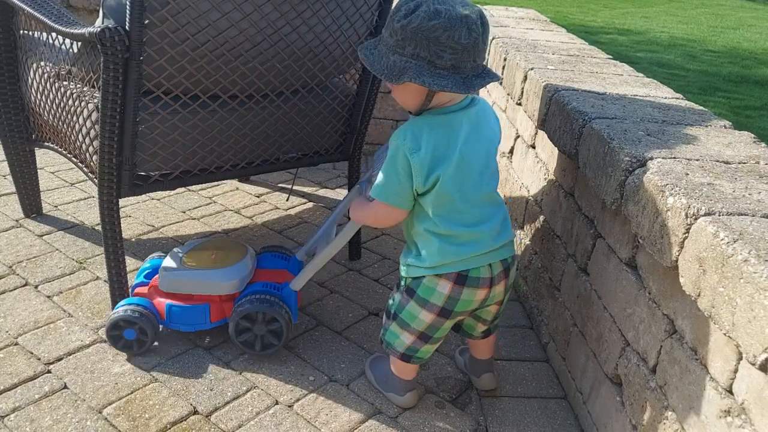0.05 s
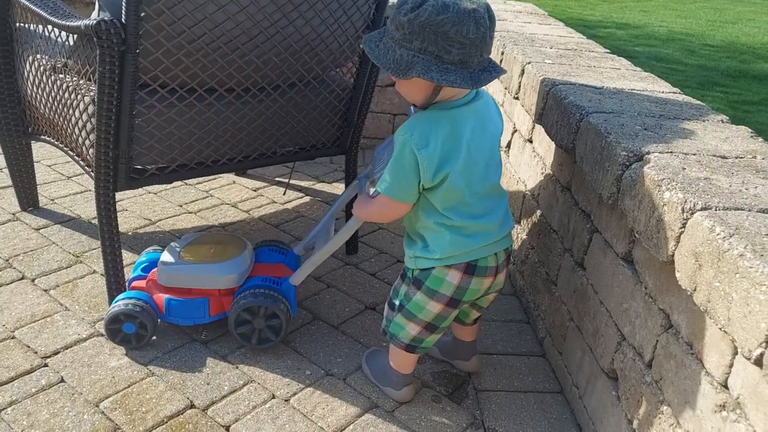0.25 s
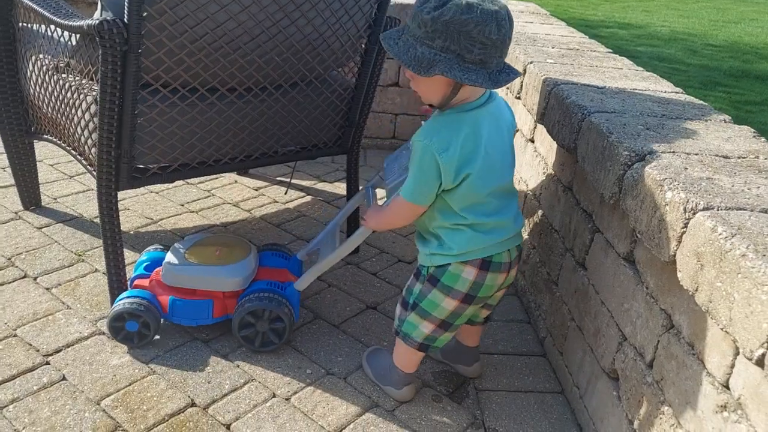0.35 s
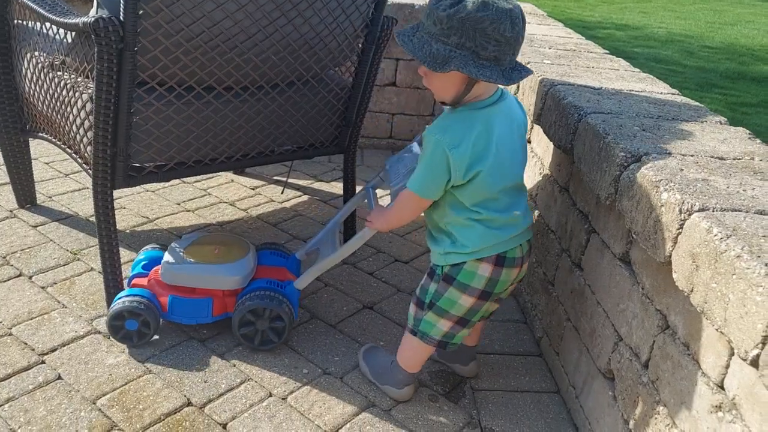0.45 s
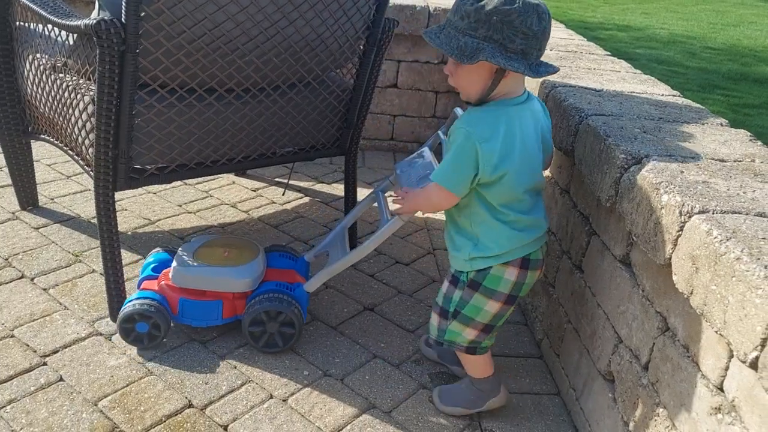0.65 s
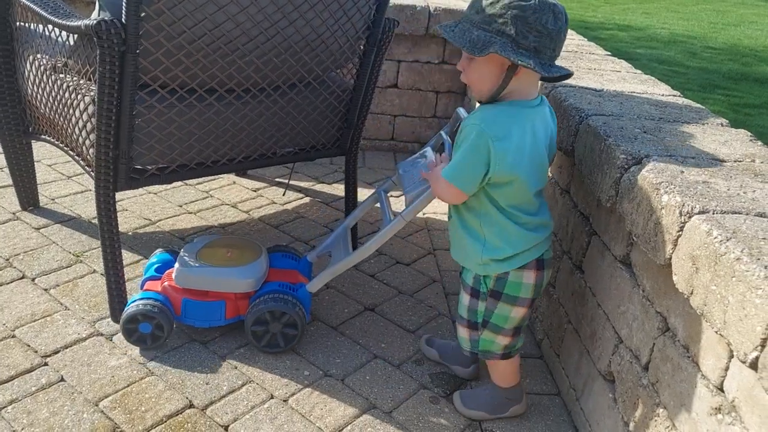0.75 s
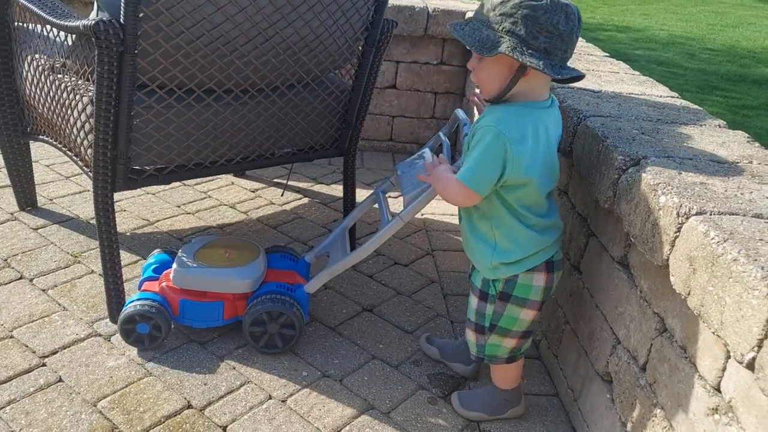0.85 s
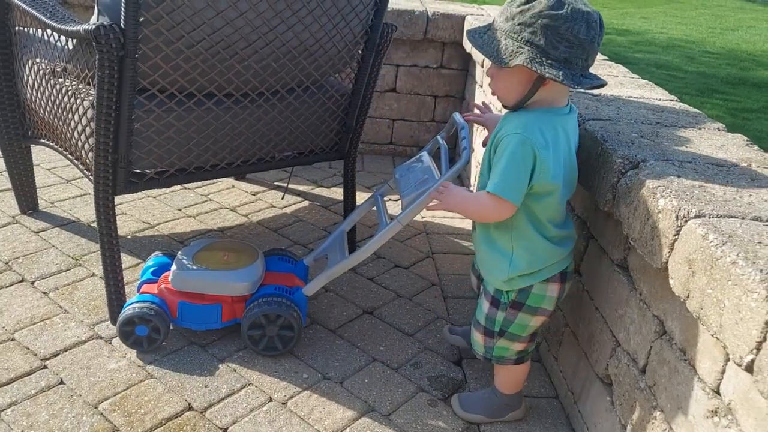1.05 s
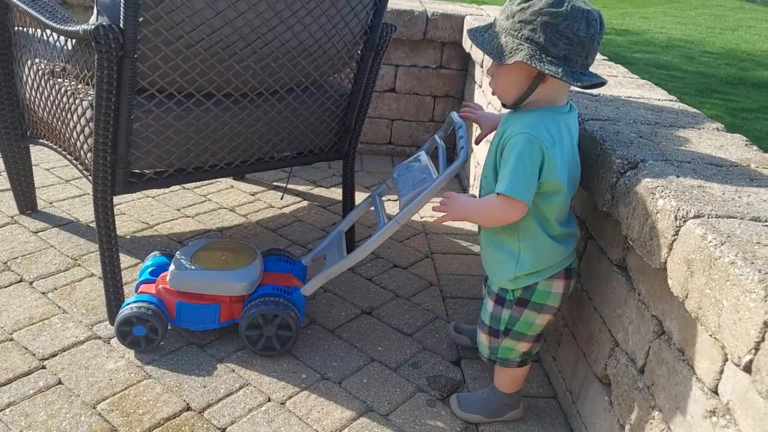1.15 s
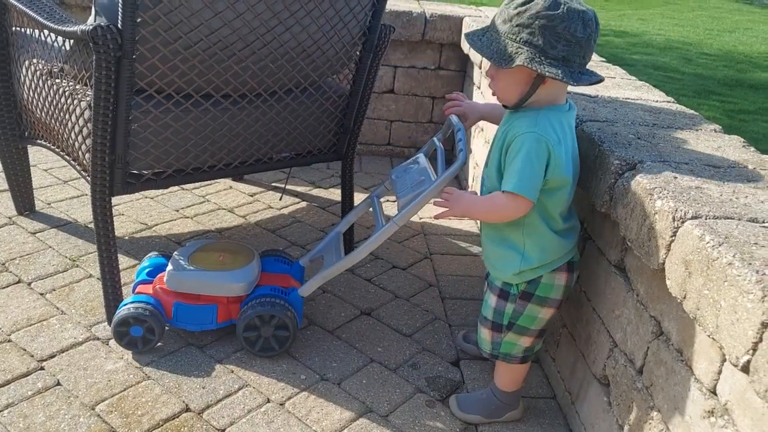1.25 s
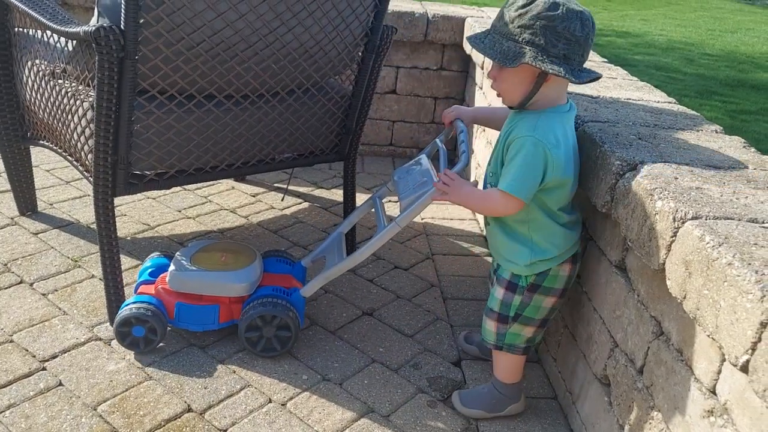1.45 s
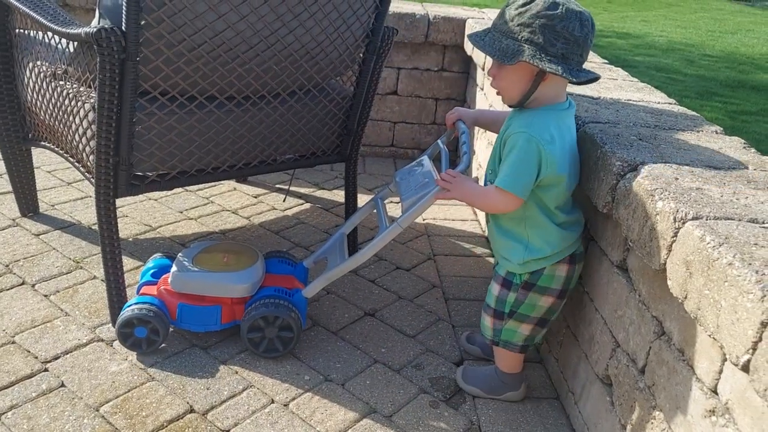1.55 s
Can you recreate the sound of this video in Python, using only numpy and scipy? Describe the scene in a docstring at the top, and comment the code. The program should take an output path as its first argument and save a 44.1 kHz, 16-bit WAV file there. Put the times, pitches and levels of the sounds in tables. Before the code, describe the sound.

Hollow plastic knocks and a short gritty wheel scrape from a toy push mower on stone paving

```python
"""A plastic toy mower is nudged over patio pavers, heard by a two-port microphone in the garden.
Out of silence come faint outdoor hush and light wind buffets; the hollow shell knocks, the wheels roll
briefly, plastic squeaks and low thuds follow. A shoe scuffs, a grain snaps, a thin chirp warbles and a
small bird trills on; the shell is knocked again and the wheels judder and scrape over gritty stone with
sharp snaps. At the very end a soft rolling rub swells up as the mower moves off. Paving and a low wall
reflect the patio sounds."""
import sys
import numpy as np
from scipy import signal
from scipy.fft import rfft, irfft
from scipy.io import wavfile
from scipy.ndimage import uniform_filter1d

SR = 44100
rng = np.random.default_rng(int(sys.argv[2]) if len(sys.argv) > 2 else 0)


def generate_wav(sig):
    """Save sig (samples, or channels by samples) to the path in sys.argv[1] as 16-bit PCM at SR."""
    pcm = np.round(np.clip(np.atleast_2d(sig).T, -1, 1) * 32767).astype(np.int16)
    wavfile.write(sys.argv[1], SR, pcm)


N = 70560
T = np.arange(N) / SR  # seconds
OPEN_S = 0.1463  # the sound begins

# Blows on the shell. Each row: start in seconds, peak level in dB before reflections,
# centre of the colour in Hz, level in dB of the contact crack before its tone filter.
BLOWS = [(0.156, -47.5, 445, -61), (0.178, -46, 480, -85), (0.1983, -37, 1090, -54),
         (.208, -39.5, 1920, -39), (.313, -40.5, 365, -56), (.337, -40, 480, -65), (0.4079, -23, 560, -43),
         (.414, -27, 650, -39.5), (.426, -24, 543, -39.5), (.442, -34, 700, -45), (0.736, -50, 920, -56),
         (.774, -46.5, 920, -54), (1.112, -37.5, 490, -75), (1.1193, -30, 450, -78),
         (1.124, -28.5, 613, -47), (1.129, -31, 766, -41), (1.203, -53, 500, -57), (1.295, -39, 620, -49)]
# Wheels scraping on stone. Each row: time in seconds, level in dB of the shell's drone,
# of its mid rattle, and of the grit before its tone filter.
SCRAPE_LEVELS = [(1.118, -70, -84, -68), (1.127, -30, -64, -37), (1.148, -43, -43, -42.5),
                 (1.172, -35.5, -45, -43.5), (1.185, -44, -41, -48), (1.204, -40, -39, -41),
                 (1.222, -40.5, -41.5, -55), (1.256, -42.5, -44.5, -39.5), (1.266, -50, -51, -45),
                 (1.282, -43, -49, -43.5), (1.298, -42.5, -47.5, -51.5), (1.308, -51, -85, -49),
                 (1.35, -57, -63, -68), (1.41, -73, -81, -111)]


def amp(db):
    """Decibels to gain."""
    return 10 ** (np.asarray(db) / 20)


def unit(x):
    """Scales to rms 1."""
    return x / np.sqrt(np.mean(x ** 2) + 1e-20)


def read(points, hz):
    """Reads a curve of (Hz, value) points on a log-frequency axis."""
    f, value = np.transpose(points)
    return np.interp(np.log(hz + 1), np.log(f), value)


def level(rows, order=1):
    """One dB column of a timed curve as gain, practically silent outside it."""
    rows = np.array(rows)
    return amp(np.interp(T, rows[:, 0], rows[:, order], left=-140, right=-140))


def add(mix, s, sound):
    """Mixes a sound in at a time in seconds."""
    part = mix[round(s * SR):][:len(sound)]
    part += sound[:len(part)]


def pan(db):
    """Left and right gains for a level difference; positive leans left."""
    return amp(np.array([[.5], [-.5]]) * db)


def colour(x, shape, size=4096):
    """Causal, minimum-phase filter with the given spectrum."""
    db = read(shape, abs(np.fft.fftfreq(size, 1 / SR)))
    spectrum = np.exp(np.conj(signal.hilbert(np.log(amp(db)))))
    taps = np.fft.ifft(spectrum).real
    return signal.fftconvolve(x, taps[:size // 2])[:len(x)]


def grains(per_s, spread_db):
    """Random clicks of uneven size and either sign."""
    size = amp(spread_db * np.minimum(rng.exponential(1, N), 4))
    sign = rng.choice([-1, 1], N)
    return unit(size * sign * (rng.random(N) < per_s / SR))


def unsteady(hz, jitter):
    """Phase of a tone whose pitch trembles."""
    tremble = unit(uniform_filter1d(rng.standard_normal(len(hz)), size=90))
    return 2 * np.pi * np.cumsum(hz * (1 + jitter * tremble)) / SR


def echo(x, t60):
    """Scattered reflections: a decaying noise tail, different in each channel."""
    t = T[:SR // 2]
    tail = rng.standard_normal((2, len(t))) * amp(-60 * t / t60) * (t > .001)
    tail /= np.linalg.norm(tail, axis=1)[:, None]
    return signal.fftconvolve(x[None], tail, axes=1)[:, :N]


def patio(x, room_db=0):
    """Direct sound, the short scatter of paving close by and the longer one of the wall."""
    near_db, near_t60 = -3, 0.017
    wall_db, wall_t60 = -10, 0.32
    near = amp(near_db) * echo(x, near_t60)
    wall = amp(wall_db) * echo(x, wall_t60)
    return x + amp(room_db) * (near + wall)


def ports(x, balance, phase):
    """Level and phase differences between the two microphone ports, by frequency."""
    hz = np.fft.rfftfreq(N, 1 / SR)
    turn = np.exp(1j * np.array([[.5], [-.5]]) * read(phase, hz))
    return irfft(rfft(x) * pan(read(balance, hz)) * turn, N)


def air():
    """Faint outdoor hush: coloured noise, partly shared by both ports, that swells in at the start."""
    # Each row: frequency in Hz, spectrum in dB.
    air_tone = [(120, -6), (200, -3), (465, 0.5), (671, -16.5), (1230, -18), (1530, -6.5), (1770, -25.5),
                (2750, -22), (5040, -15), (5730, -28.5), (6640, -26), (7540, -16), (8900, -24.5),
                (14600, -21), (16000, -55.5)]
    air_db, rise_s = -64, 0.15
    left, right, both = [unit(colour(rng.standard_normal(N), air_tone)) for _ in range(3)]
    hush = unit(np.array([left, right]) + 0.38 * both)
    return amp(air_db) * hush * np.sqrt(np.clip((T - OPEN_S) / rise_s, 0, 1))


def wind():
    """Low buffets on the microphone: evened-out low noise, unrelated at the two ports."""
    # Each row: time in seconds, level in dB, left-right difference in dB.
    gusts = [(0.16, -51, 20), (0.254, -63, 8), (0.274, -44, 12.5), (0.306, -37, 6.5), (0.364, -50, -6),
             (0.404, -42, 15), (0.424, -35, 8.5), (0.48, -42.5, -1), (0.5, -36, -2.5), (0.558, -40.5, -7),
             (0.598, -57, -8.5), (0.626, -43.5, 5.5), (0.666, -42, -9.0), (0.724, -51, 5.5),
             (0.764, -58.5, -7.5), (0.898, -61, 10.5), (0.914, -50.5, 17.5), (0.962, -46, -13.5),
             (1.112, -53, 1), (1.136, -44, 18.5), (1.208, -56, 27.5), (1.29, -42, 0), (1.362, -47, 13.5),
             (1.402, -64, -8), (1.432, -56.5, 25.5), (1.488, -57.5, 24.5), (1.532, -77, 12.0),
             (1.58, -61, 1)]
    # Each row: frequency in Hz, spectrum in dB.
    wind_tone = [(15, -35), (30, -24.5), (50, -3), (68, 1), (85, -4.5), (105, -9.5), (150, -19.5),
                 (220, -26), (400, -31.5), (1200, -73.5)]
    s, db, side_db = np.transpose(gusts)
    lumps = np.array([colour(rng.standard_normal(N), wind_tone) for _ in range(2)])
    lumps /= np.sqrt(uniform_filter1d(lumps ** 2, size=1800, axis=1) + 1e-12)
    return lumps * amp(np.interp(T, s, db)) * pan(np.interp(T, s, side_db))


def whistle(length, from_hz, to_hz):
    """One quick glide, swelling and fading."""
    u = np.arange(0, length, 1 / SR) / length
    hz = from_hz + (to_hz - from_hz) * u
    return np.sin(np.pi * u) ** 2 * np.sin(2 * np.pi * np.cumsum(hz) / SR)


def bird():
    """An even trill across the garden: falling whistle, rising flick, each a little out of tune."""
    # One level in dB per note, before the echo and the lean to one side.
    note_db = [-67.5, -62, -59.5, -56, -57, -60, -59, -52, -49, -51, -53.5, -51, -52]
    start_s, step_s, tune_spread = .7825, .0626, 0.0186
    fall_s, fall_hz = 0.02, (6300, 4000)
    flick_at_s, flick_s, flick_hz, flick_db = .022, .014, (4480, 8770), -4.5  # dB against the fall
    out = np.zeros(N)
    for k, db in enumerate(note_db):
        s = start_s + k * step_s
        tune = 1 + tune_spread * rng.standard_normal(2)
        add(out, s, amp(db) * whistle(fall_s, *np.multiply(fall_hz, tune[0])))
        flick = whistle(flick_s, *np.multiply(flick_hz, tune[1]))
        add(out, s + flick_at_s, amp(db + flick_db) * flick)
    wet_db, t60 = 0, 0.28
    return (out + amp(wet_db) * echo(out, t60)) * pan(db=-9)


def thuds():
    """Soft low thuds of steps and wheels, whose pitch sags as they die."""
    # Each row: start in seconds, peak level in dB before reflections, starting pitch in Hz.
    pushes = [(.271, -44.5, 237), (.284, -41, 84.4), (0.313, -44.5, 142.4), (.500, -35.5, 99),
              (0.91, -47.5, 148.5), (0.949, -42, 123), (0.973, -44, 134), (1.018, -41.5, 125)]
    peak_s, sag_per_s = 0.0068, 14
    out, t = np.zeros(N), T[:SR // 8]
    swell = t / peak_s * np.exp(1 - t / peak_s)
    for s, db, hz in pushes:
        phase = 2 * np.pi * np.cumsum(hz * np.exp(-sag_per_s * t)) / SR
        add(out, s, amp(db) * swell * np.sin(phase))
    return patio(out, room_db=-4.5)


def scuff_and_moving_off():
    """Dense grains in a stony colour: a sole drags over the pavers; at the end the mower rolls off."""
    # Each row: time in seconds, level in dB before reflections and pan;
    # the rise in the last two rows is the mower moving off.
    rub_levels = [(.48, -70), (.58, -68.5), (.63, -62.5), (.70, -60), (.75, -54.5), (.78, -63), (.81, -64),
                  (.9, -92), (1.52, -95), (1.6, -62.5)]
    # Each row: frequency in Hz, spectrum in dB.
    rub_tone = [(250, -19), (470, -2), (650, -4), (850, 5.5), (1250, -23), (1520, -5.5), (1800, -15),
                (2300, -19.5), (2490, -4), (2750, -18), (3900, -10.5), (5700, -15.5), (6800, -9.5),
                (8100, -13.5), (9000, -38), (13000, -20), (16000, -26)]
    rub = unit(colour(grains(per_s=8100, spread_db=3), rub_tone))
    return patio(rub * level(rub_levels)) * pan(db=-3)


def warble():
    """A thin chirp: one sine that wanders quickly in pitch and level."""
    # Each row: time in seconds, level in dB before the chirp gain, pitch in Hz before jitter.
    chirp = [(.695, -72, 3600), (.712, -58, 4500), (.725, -56, 3700), (.731, -58, 4050), (.739, -62, 3400),
             (.750, -55, 4100), (.759, -61, 3200), (.765, -57, 3800), (.78, -70, 2800)]
    gain_db, jitter = 0.5, 0.0098
    s, _, pitch = np.transpose(chirp)
    return amp(gain_db) * level(chirp) * np.sin(unsteady(np.interp(T, s, pitch), jitter))


def squeaks():
    """Thin gliding, fluttering tones of axle and rubbing plastic, with the warbling chirp."""
    # Each row: start in seconds, length in seconds, mid-glide pitch in Hz before jitter,
    # level in dB before flutter, glide as a share of the pitch.
    rubs = [(.198, 0.028, 1511, -44.5, 0.022), (0.276, 0.135, 2310, -58.5, -0.018),
            (.452, 0.061, 645.6, -51.5, -0.2), (.59, 0.12, 2483, -70.5, -0.002)]
    octave_db, jitter, flutter_db = -18.5, 0.0051, 2.5
    out = warble()
    for s, length, hz, db, glide in rubs:
        u = np.arange(0, length, 1 / SR) / length
        phase = unsteady(hz * (1 + glide * (u - .5)), jitter)
        flutter = unit(uniform_filter1d(rng.standard_normal(len(u)), size=500))
        gain = amp(db + flutter_db * flutter) * np.sqrt(4 * u * (1 - u))
        add(out, s, gain * (np.sin(phase) + amp(octave_db) * np.sin(2 * phase)))
    return patio(out, room_db=2.5)


def grit():
    """Sand crunches and snaps between plastic and stone, its colour turning late in the push."""
    # Snaps under a wheel. Each row: start in seconds, level in dB before the tone filter.
    snaps = [(0.6238, -46.5), (1.1255, -33), (1.131, -53), (1.253, -41), (1.258, -47), (1.287, -32),
             (1.294, -26)]
    # Crunch before and after the turn. Each row: frequency in Hz, spectrum in dB.
    early_tone = [(2000, -21), (4600, -16), (5850, 2.5), (6250, 14.5), (7100, 6), (8200, 6.5), (9000, -3.5),
                  (11500, -4.5), (13200, 5), (14300, -5), (15600, -3)]
    late_tone = [(2000, -21), (4600, -6.5), (5900, -3.5), (6300, 12.5), (7900, 6.5), (9050, -10), (9600, 0),
                 (10500, -15), (11600, 6), (13400, 10), (14400, 1), (15500, -1)]
    turn_s, turn_length_s, snap_decay_s = 1.228, 0.029, .0012
    drive = grains(per_s=9000, spread_db=4.5) * level(SCRAPE_LEVELS, order=3)
    t = T[:SR // 50]
    for s, db in snaps:
        add(drive, s, amp(db) * np.exp(-t / snap_decay_s) * rng.standard_normal(len(t)))
    late = np.clip((T - turn_s) / turn_length_s + .5, 0, 1)
    before = colour(drive * np.sqrt(1 - late), early_tone)
    after = colour(drive * np.sqrt(late), late_tone)
    return patio(before + after)


def contacts():
    """The dry crack of hard plastic that comes with each blow: a short coloured noise burst."""
    # Each row: frequency in Hz, spectrum in dB.
    crack_tone = [(300, -11), (1000, -1), (2600, 6.5), (3300, -2.5), (5000, -3.5), (6300, -9), (7600, -9),
                  (9800, -23.5), (16000, -17)]
    decay_s = 0.0044
    out, t = np.zeros(N), T[:SR // 20]
    for s, _, _, db in BLOWS:
        add(out, s, amp(db) * np.exp(-t / decay_s) * rng.standard_normal(len(t)))
    return patio(colour(out, crack_tone), room_db=4)


def shell_ring():
    """The hollow shell's answer to one tap: a noise crack and its decaying modes."""
    # Each row: mode frequency in Hz, level in dB, time to fall 60 dB in seconds.
    modes = [(333.3, -8.5, 0.071), (407.4, -6, 0.041), (478.6, -1, 0.057), (620.7, -11, 0.076),
             (713, -2, 0.038), (854, -5, 0.027), (941, -10, 0.049), (1100, -4.5, 0.027), (1257, -13, .07),
             (1503, -4, 0.075), (2045, -10.5, 0.019), (2519, -9, 0.022), (3524, -11.5, 0.02),
             (4930, -18, 0.15)]
    crack_db, crack_decay_s = 3, .0012
    t = T[:SR // 4]
    ring = np.zeros(len(t))
    for k, (hz, db, t60) in enumerate(modes):
        ring += (-1) ** k * amp(db - 60 * t / t60) * np.sin(2 * np.pi * hz * t)
    return ring + amp(crack_db) * np.exp(-t / crack_decay_s) * rng.standard_normal(len(t))


def knocks(ring):
    """Each blow sets loose parts chattering and rings the shell, dull or bright."""
    chatter_decay_s, chatter_db = 0.0058, -2  # dB against the tap itself
    round_octaves, slope_db_per_octave = 0.21, 10  # hump of the colour: rounded top, skirts
    out, t = np.zeros(N), T[:len(ring)]
    hz = np.geomspace(50, 16000, 40)
    for s, db, centre_hz, _ in BLOWS:
        blow = rng.standard_normal(len(t)) * np.exp(-t / chatter_decay_s)
        blow *= amp(chatter_db) / np.linalg.norm(blow)
        blow[0] += 1  # the tap
        hump = -slope_db_per_octave * np.hypot(np.log2(hz / centre_hz), round_octaves)
        hit = colour(signal.fftconvolve(blow, ring)[:len(t)], np.c_[hz, hump])
        add(out, s, amp(db) * hit / abs(signal.hilbert(hit)).max())
    return out


def judder(ring):
    """The wheels stick and slip, shaking the shell: a short roll, then a harder scrape."""
    # Short roll. Each row: time in seconds, level in dB before reflections.
    roll = [(.194, -67), (.2, -45.5), (.214, -45.5), (.225, -51), (.237, -45.5), (.252, -52.5), (.264, -48),
            (.285, -55.5), (.34, -67), (.39, -70)]
    # Spectra of roll, scrape drone and scrape rattle. Each row: frequency in Hz, spectrum in dB.
    roll_tone = [(150, -7), (330, 1), (480, -5.5), (720, -5), (1050, -5), (1500, -7.5), (2400, 5),
                 (3400, 1.5), (5000, -3), (6300, -24), (7600, -10), (10000, -33), (15000, -28)]
    drone_tone = [(150, -13.5), (330, -1), (480, -0.5), (720, -0.5), (950, 4.5), (1300, -8.5), (1550, -3),
                  (2200, -29.5), (5000, -42)]
    rattle_tone = [(800, -24), (1400, -6), (2050, 5), (2500, 4), (2900, -1), (3520, 6), (4200, -15),
                   (8000, -36)]
    slips = grains(per_s=1800, spread_db=2.5)
    shaken = signal.fftconvolve(slips, ring)[:N]
    drone = unit(colour(shaken, drone_tone)) * level(SCRAPE_LEVELS, order=1)
    rattle = unit(colour(shaken, rattle_tone)) * level(SCRAPE_LEVELS, order=2)
    rolling = unit(colour(shaken, roll_tone)) * level(roll)
    return drone + rattle + rolling


def mower():
    """Shell, contact cracks and grit, each pitch range with its own balance between the ports."""
    # Each row: frequency in Hz, left-right difference in dB.
    balance = [(300, -3), (500, 1.5), (900, 1), (2000, 4), (4000, 0), (7000, -4.5), (14000, -6.5)]
    # Each row: frequency in Hz, phase in radians by which left leads.
    lead = [(300, 0), (1100, -0.7), (2000, -1), (4000, -1.7), (7000, -2.03), (14000, -1.3)]
    ring = shell_ring()
    shell = patio(knocks(ring) + judder(ring), room_db=-2.5)
    return ports(shell + contacts() + grit(), balance, lead)


def scene():
    """Everything on the patio and in the garden around it."""
    return air() + wind() + bird() + thuds() + scuff_and_moving_off() + squeaks() + mower()


def record(dry):
    """The sound opens quickly out of silence; then a rumble filter and the band limit."""
    open_length_s, rumble_cut_hz, edge_hz = 0.025, 34, 15950
    opened = dry * np.clip((T - OPEN_S) / open_length_s, 0, 1)
    rumble_filter = signal.butter(2, rumble_cut_hz, "high", fs=SR, output="sos")
    opened = signal.sosfilt(rumble_filter, opened)
    band_limit = signal.firwin(511, edge_hz, window=("kaiser", 9), fs=SR)
    return signal.oaconvolve(opened, band_limit[None], "same")


dry = scene()
out = record(dry)
generate_wav(out)
```